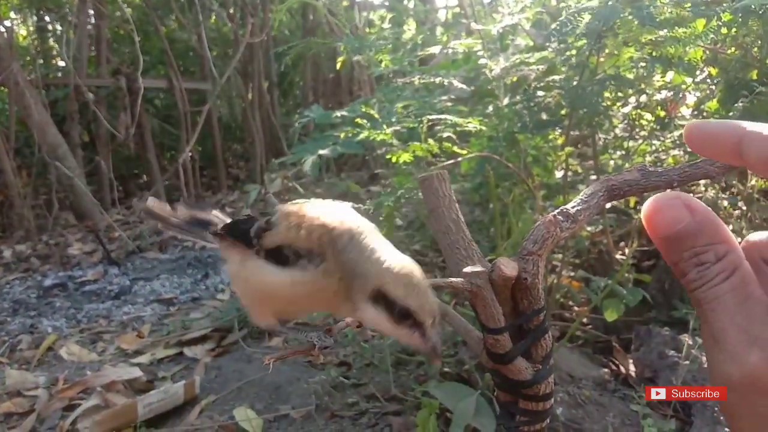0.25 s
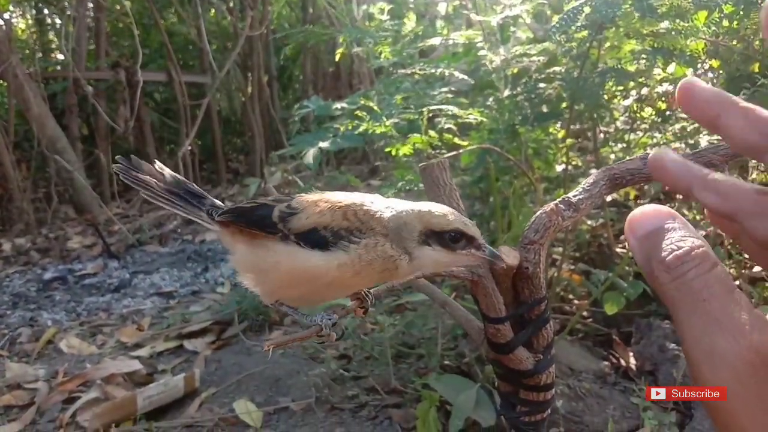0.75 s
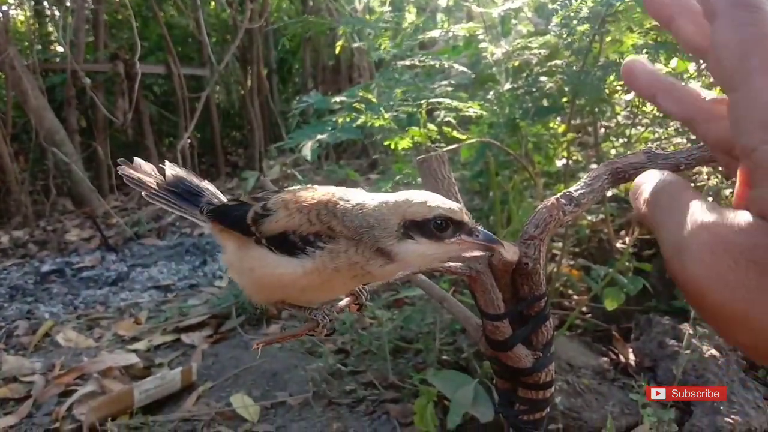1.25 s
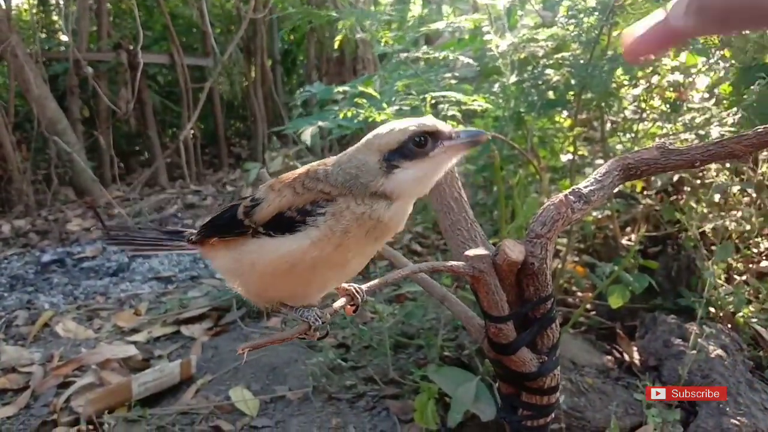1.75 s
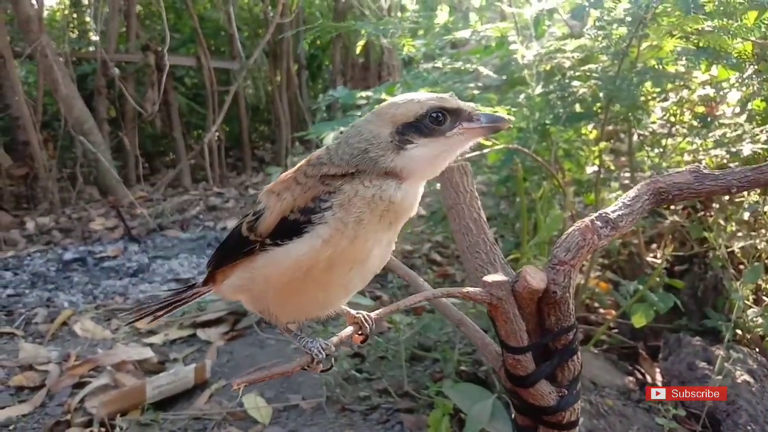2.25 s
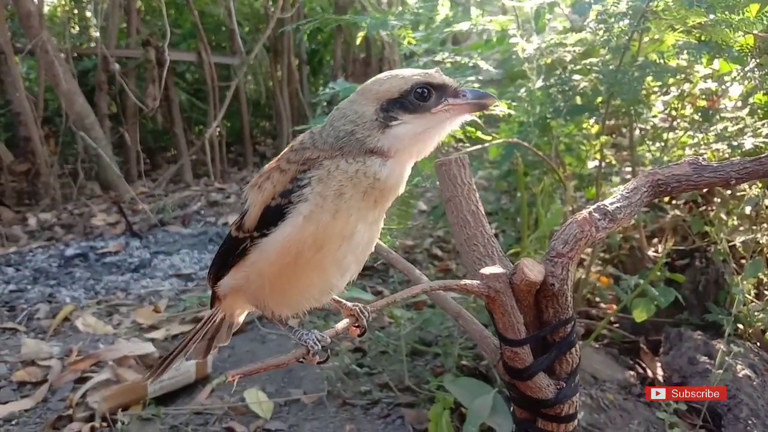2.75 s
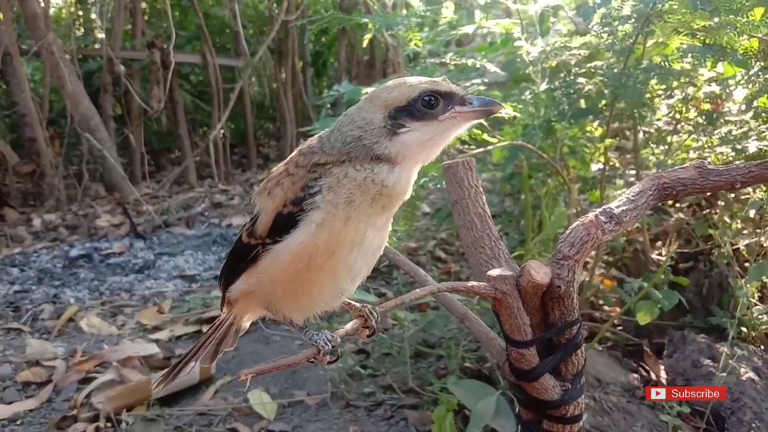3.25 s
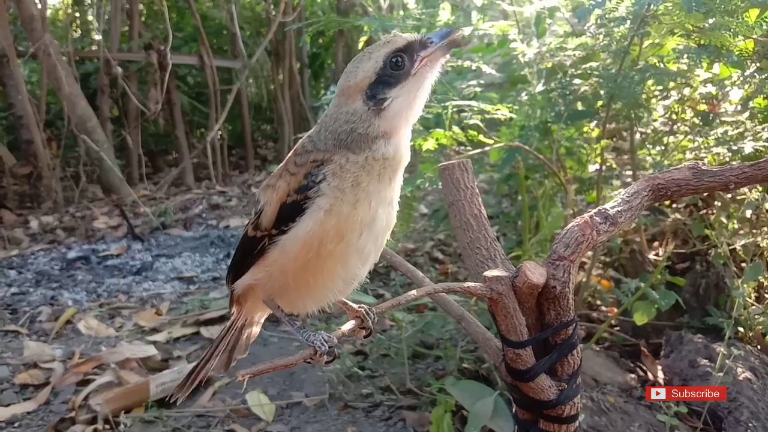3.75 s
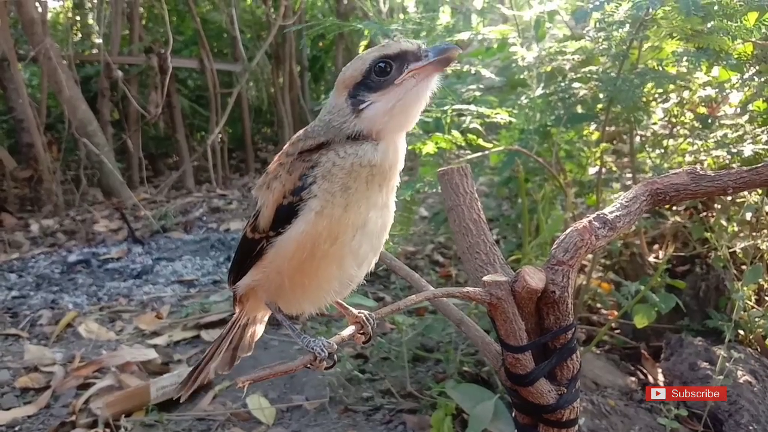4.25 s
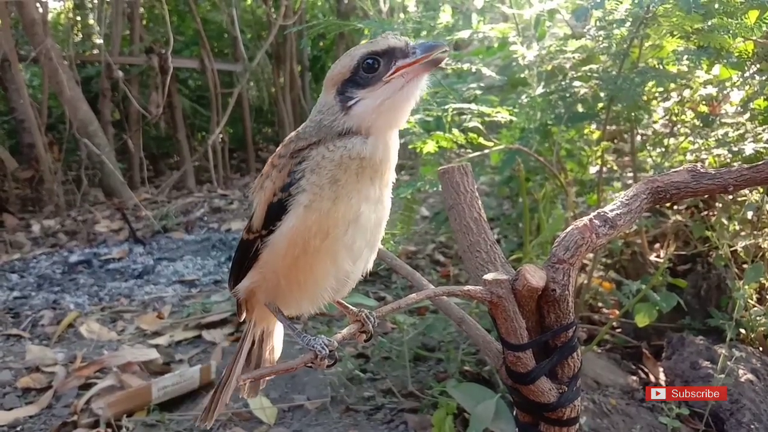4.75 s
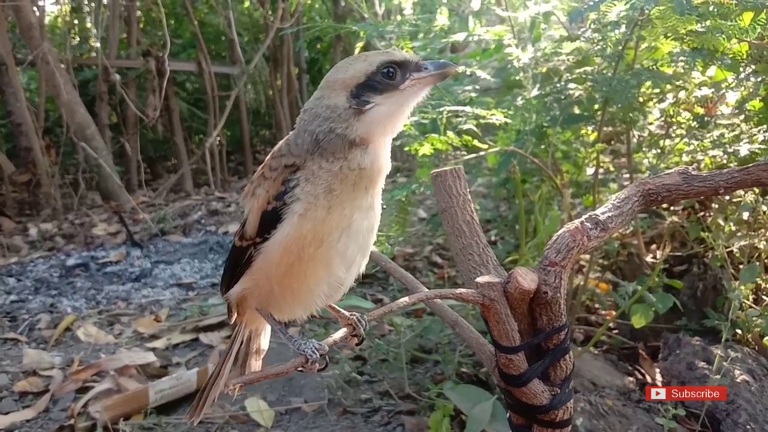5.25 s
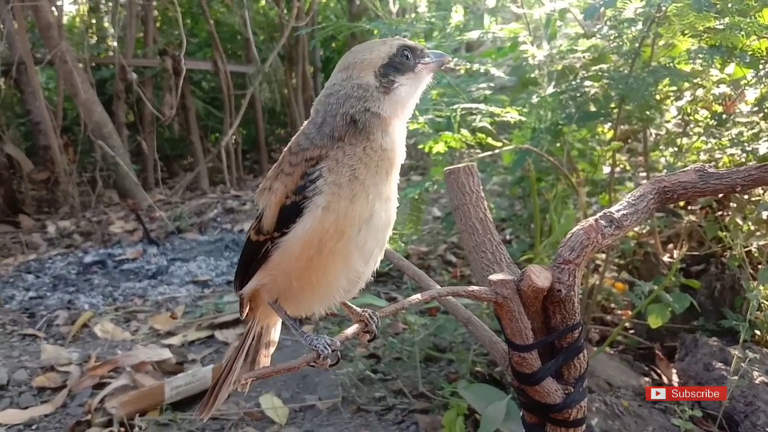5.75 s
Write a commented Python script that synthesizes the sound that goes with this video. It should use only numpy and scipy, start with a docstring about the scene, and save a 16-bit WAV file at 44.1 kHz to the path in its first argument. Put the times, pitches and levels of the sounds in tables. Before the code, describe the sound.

A small bird close by gives a tiny squeak, a snap and falling whistle with rasps, then sharp chirps, while distant birds whistle over soft outdoor hiss.

```python
"""Shrike close to the microphone

A shrike close to a small two-port microphone gives squeaks, a two-voiced whistle, rasps and throbbing
chirps, built from overtones and breath noise. Twigs tick nearby as snaps of noise.
Among the trees other birds whistle, as sines with echo, and a distant cock crows, heard only as echo.
Faint fuzzy tones come and go; a low rumble of far traffic lies under the hiss of the air, all shaped noise."""
import sys
import numpy as np
from scipy import signal
from scipy.fft import rfft, irfft
from scipy.io import wavfile
from scipy.ndimage import uniform_filter1d

SR = 44100
rng = np.random.default_rng(int(sys.argv[2]) if len(sys.argv) > 2 else 0)


def ratio_of_db(decibels):
    """Turn decibels (scalar or array-like) into linear amplitude factors; 0 dB maps to 1."""
    return 10 ** (np.asarray(decibels, float) / 20)


def transcribe(u):
    """Save the signal u as a 16-bit wav file named by the first command-line argument.

    u: samples, shape (n,) or (channels, n), limited to [-1, 1]; the rate is SR.
    q: integer samples, one column per channel.
    """
    v = np.clip(np.atleast_2d(u).T, -1, 1)
    q = np.round(v * 32767).astype(np.int16)
    wavfile.write(sys.argv[1], SR, q)


N = 264159  # samples, about 6 s


def evened(x):
    """Scales to rms 1."""
    return x / np.sqrt(np.mean(x ** 2) + 1e-20)


def read(points, hz):
    """Reads a spectrum on a log-frequency axis."""
    f, value = np.transpose(points)
    return np.interp(np.log(hz + 1), np.log(f + 1), value)


def add(mix, s, sound):
    """Mixes a sound in at s seconds."""
    part = mix[round(s * SR):][:len(sound)]
    part += sound[:len(part)]


def drift(size, span):
    """Smooth chance of rms 1: noise averaged twice over span samples."""
    span = max(int(span), 1)
    once = uniform_filter1d(rng.standard_normal(size), span)
    return evened(uniform_filter1d(once, span))


def coloured(x, points):
    """Filters by a spectrum in dB."""
    size = x.shape[-1]
    gain = ratio_of_db(read(points, np.fft.rfftfreq(size, 1 / SR)))
    return irfft(rfft(x) * gain, size)


def band(x, hz, width):
    """A resonance applied once."""
    return signal.lfilter(*signal.iirpeak(hz, hz / width, SR), x)


def follow(rows, edge_s):
    """Pitch and gain along a table, with soft ends."""
    s, hz, db = np.transpose(rows)
    t = np.arange(s[0], s[-1], 1 / SR)
    ends = np.clip(np.minimum(t - s[0], s[-1] - t) / edge_s, 0, 1)
    return np.interp(t, s, hz), ratio_of_db(np.interp(t, s, db)) * np.sin(np.pi / 2 * ends) ** 2


def glide(start, length, from_hz, to_hz, db, peak, start_db, end_db):
    """A note that slides evenly in octaves, swells to its peak (a share of the length) and falls."""
    peak = np.clip(peak, .01, .99)
    peak_hz = from_hz * (to_hz / from_hz) ** peak
    return [(start, from_hz, db + start_db),
            (start + peak * length, peak_hz, db),
            (start + length, to_hz, db + end_db)]


def trees(x, t60, rise_s, side_db):
    """Scattered echoes from trunks and leaves, nearly alike at both ports."""
    t = np.arange(SR // 2) / SR
    build_up = 1 - np.exp(-(t / rise_s) ** 2)
    taps = rng.standard_normal((2, len(t))) * ratio_of_db(-60 * t / t60) * build_up
    tail = signal.fftconvolve(x[None], taps / np.linalg.norm(taps[0]), axes=1)[:, :N]
    return tail[0] + ratio_of_db(side_db) * tail[1] * np.array([[1], [-1]])


# spectrum of air and microphone hiss: [f/Hz, relative level/dB per Hz]
AIR_SPECTRUM = [(120, -29), (200, 3.5), (294, -5), (334, -2), (394, -13), (558, -10.5), (659, -9),
                (777, -7), (1000, -12), (1230, -7.5), (1370, -11), (3070, -14.5), (6170, -14), (8270, -32),
                (16000, -36.5)]
# ringing hollows of the microphone housing: [f/Hz, width of one pass/Hz, level/dB before flicker, flicker/dB]
HOLLOWS = [(1251, 66, -74, 5), (6170, 130, -76, 1.5), (7160, 150, -85, 0.5), (15200, 1500, -89, 3.5)]
# spectrum of far traffic: [f/Hz, relative level/dB per Hz]
TRAFFIC_SPECTRUM = [(12, -48.5), (20, -24.5), (32, -17), (74, 2.5), (97, 10), (152, 0), (193, -7.5),
                    (274, -25), (300, -37), (390, -46), (660, -120)]
# swell of the traffic before its quick lumps: [t/s, level/dB]
TRAFFIC_SWELL = [(0.0, -67), (0.1, -45.5), (0.28, -61), (0.32, -53), (0.7, -55.5), (0.88, -48),
                 (1.13, -57.5), (1.17, -47.5), (1.3, -57.5), (1.57, -48), (1.6, -56.5), (1.84, -56),
                 (1.87, -47.5), (2.02, -56.5), (2.83, -52), (2.92, -62.5), (3.02, -56.5), (5.34, -59.5),
                 (5.52, -50), (5.6, -60.5), (5.69, -49.5), (5.99, -62)]
# filter on the left-right difference of the background: [f/Hz, gain/dB]
SIDE_SPECTRUM = [(30, -13), (90, -42.5), (400, -16.5), (3000, -11.5), (10000, -23)]


def background():
    """Noise as hiss with slow swells, ringing hollows and a lumpy rumble."""
    noise = rng.standard_normal((3, 2, N))  # three sources, each as middle and difference
    air = ratio_of_db(-66 + 1.0 * drift(N, 9000)) * evened(coloured(noise[0], AIR_SPECTRUM))
    hollows = np.zeros((2, N))
    for hz, width, db, flicker_db in HOLLOWS:
        ring = evened(band(band(noise[1], hz, width), hz, width))
        hollows += ratio_of_db(db + flicker_db * drift(N, 1200)) * ring
    lump_db, lump_s = 1, 0.031
    swell_db = np.interp(np.arange(N) / SR, *np.transpose(TRAFFIC_SWELL)) + lump_db * drift(N, lump_s * SR)
    roar = evened(coloured(noise[2], TRAFFIC_SPECTRUM))
    drone = evened(band(noise[2], 149.7, 6.5))  # an engine far away
    rumble = ratio_of_db(swell_db) * evened(roar + 0.47 * drone)
    mid, side = air + hollows + rumble
    return mid + coloured(side, SIDE_SPECTRUM) * np.array([[1], [-1]])


# faint fuzzy tones far off: [t/s, length/s, f/Hz, width of one pass/Hz, level/dB before the fades]
FUZZY_TONES = [(0.224, 0.17, 5220, 60, -75.5), (0.53, 0.052, 850, 80.5, -64.5), (0.651, 0.43, 780, 90, -70),
               (0.676, 0.32, 1498, 80, -66), (0.808, 0.24, 1737, 70, -71), (1.585, 0.061, 760, 150.4, -66),
               (1.664, 0.32, 1467, 60, -70), (1.695, 0.057, 314, 40, -62), (2.086, 0.114, 610, 50, -72.5),
               (2.891, 0.21, 330, 25, -69), (2.943, 0.066, 2440, 60, -70.5), (3.168, .18, 331, 25, -66),
               (5.096, 0.75, 1045, 90, -73.5)]


def faint_tones():
    """Noise in a narrow resonance, swelling and fading."""
    out = np.zeros(N)
    for s, length, hz, width, db in FUZZY_TONES:
        noise = rng.standard_normal(round(length * SR))
        tone = evened(band(band(noise, hz, width), hz, width))
        add(out, s, ratio_of_db(db) * tone * signal.windows.tukey(len(noise), .6))
    return out


# a distant cock, before its echo: [t/s, f/Hz, level/dB of the fundamental]
COCK_CROW = [(0.081, 838, -50), (.2, 826.4, -52.5), (0.362, 823, -51), (0.459, 757, -72)]


def cock():
    """A hoarse wavering tone with its octave and the fifth between them."""
    out = np.zeros(N)
    hz, gain = follow(COCK_CROW, 0.016)
    turn = 2 * np.pi * np.cumsum(hz * (1 + 0.0204 * drift(len(hz), 250))) / SR
    tone = np.sin(turn) + 0.69 * np.sin(2 * turn) + 0.53 * np.sin(1.5 * turn)
    add(out, COCK_CROW[0][0], gain * (1 + .5 * drift(len(hz), 400)) * tone)
    return out


def whistles(table, flutter, span, warble):
    """Fluttering sines, all of them and the share that arrives directly: the fainter, the more foliage hides."""
    out, direct = np.zeros((2, N))
    for rows in table:
        hz, gain = follow(rows, 0.0037)
        swell = 1 + flutter * drift(len(hz), span)
        turns = np.cumsum(hz * (1 + warble * drift(len(hz), 250))) / SR
        whistle = gain * evened(swell * np.sin(2 * np.pi * turns))
        loudest_db = max(row[2] for row in rows)
        add(out, rows[0][0], whistle)
        add(direct, rows[0][0], whistle * np.clip((loudest_db + 58) / 26, 0, 1))
    return out, direct


# The levels of these tables are at the bird, before foliage and echo.
# winding whistles among the trees, one list a whistle: [t/s, f/Hz, level/dB]
WINDING_WHISTLES = [
    [(1.175, 7650, -67.5), (1.2, 6660, -53), (1.226, 5770, -53.5), (1.24, 4900, -36), (1.251, 3890, -33.5),
     (1.262, 2955, -36.5), (1.277, 2650, -61)],
    [(1.482, 5430, -52.5), (1.497, 4560, -32.5), (1.511, 3390, -36), (1.521, 2825, -38), (1.538, 2540, -61)],
    [(2.08, 3025, -71), (2.115, 2948, -62), (2.13, 2940, -64)],
    [(2.198, 3970, -48), (2.21, 3640, -55), (2.23, 2990, -61), (2.29, 2940, -61), (2.3, 2700, -63),
     (2.35, 2650, -66)],
    [(5.59, 3108, -74), (5.66, 3420, -56.5), (5.69, 3630, -67), (5.71, 4100, -61), (5.73, 3570, -73.5),
     (5.79, 3650, -72)],
    [(5.826, 7550, -66), (5.845, 6940, -60.5), (5.88, 5980, -57.5), (5.92, 5330, -68), (5.95, 5330, -48)],
]
# flick before a falling whistle: [t after its start/s, f/Hz, level/dB added to the flick's own]
FLICK_SHAPE = [(0, 1800, -23), (.024, 2233, -9.5), (.032, 4300, -1)]
# the flicks: [t/s, level/dB]
FLICKS = [(1.194, -46), (1.447, -39.5)]
# plain fading notes among the trees: [t/s, length/s, from f/Hz, to f/Hz, peak level/dB]
PLAIN_NOTES = [(.73, .045, 3284, 3180, -56), (0.773, 0.037, 2630, 2600, -61),
               (1.94, 0.029, 3710, 3850, -62.5), (2.138, 0.033, 3320, 3350, -48),
               (3.197, 0.039, 3100, 2940, -56), (4.345, 0.063, 3150, 3000, -61),
               (4.36, 0.041, 3800, 3770, -67.5), (4.385, 0.042, 2495, 2450, -65),
               (4.86, 0.15, 3280, 2500, -62), (5.29, 0.061, 3140, 2725, -57)]
# hoarse calls from deep in the wood: [t/s, length/s, from f/Hz, to f/Hz, peak level/dB]
DEEP_CALLS = [(0.68, 0.036, 5700, 2146, -49), (3.159, .034, 5400, 2048, -52),
              (4.285, 0.031, 5300, 2093, -51.5), (5.234, .032, 5300, 2115, -51),
              (5.914, 0.059, 4550, 4630, -48.5), (5.92, 0.032, 4300, 2020, -71)]


def far_birds():
    """Whistles with scatter close to the path and echoes from the trunks; deep calls and cock are echo only."""
    flicks = [[(s + after, hz, db + below_db) for after, hz, below_db in FLICK_SHAPE] for s, db in FLICKS]
    notes = [glide(*row, peak=.05, start_db=-4, end_db=-7.5) for row in PLAIN_NOTES]
    far, direct = whistles(WINDING_WHISTLES + flicks + notes, flutter=0.18, span=43, warble=.02)
    leaves = ratio_of_db(1.0) * trees(far, t60=0.12, rise_s=0.0004, side_db=-36)
    trunk_echo = trees(far + cock(), t60=0.39, rise_s=0.013, side_db=-37)
    trunks = ratio_of_db(-7) * coloured(trunk_echo, [(2500, -2.0), (5000, -3.5), (7500, 19.5)])
    calls = [glide(*row, peak=0.594, start_db=-4.5, end_db=-2) for row in DEEP_CALLS]
    hoarse = whistles(calls, flutter=0.52, span=12.7, warble=0.0698)[0]
    deep = trees(hoarse, t60=0.24, rise_s=0.0036, side_db=-30)
    return direct + leaves + trunks + deep


# twigs and bill, near the microphone: [t/s, peak level/dB, colour f/Hz, dullness 0-1]
SNAPS = [(0.563, -35, 4000, 0.6), (1.107, -47, 6100, 0), (1.717, -48, 2380, .95), (2.3986, -17, 2980, 0),
         (4.1115, -51.5, 6000, .8), (4.6703, -39, 4970, .8)]


def ticks():
    """Short dry snaps of decaying noise; dull ones keep little but their own colour."""
    out, t = np.zeros(N), np.arange(600) / SR
    for s, db, hz, dull in SNAPS:
        snap = rng.standard_normal(len(t)) * ratio_of_db(-60 * t / 0.021)
        snap = (1 - dull) * snap + band(snap, hz, 0.55 * hz)
        colour = [(500, -24.5), (1250, -2.5), (7000, -4), (10000, -14 - 20 * dull), (15000, -6 - 36 * dull)]
        snap = coloured(np.pad(snap, 100), colour)
        add(out, s - 100 / SR, ratio_of_db(db) * snap / abs(snap).max())
    return out


# resonance of the shrike's throat and beak, with the microphone's treble: [f/Hz, gain/dB]
VOICE_SPECTRUM = [(700, -26.5), (1000, -36.5), (1250, 3), (1550, -13), (2000, 3.5), (3000, 7), (4000, 8.5),
                  (4900, 12), (5500, 9), (6200, 10.5), (7500, -5.5), (9500, -36.5), (13000, -47.5),
                  (15000, -35)]


def syllable(rough, tilt_db, rows):
    """Membranes in the syrinx make overtones; driven hard they wobble, stutter and hiss."""
    hz, gain = follow(rows, 0.00096 + 0.025 * (rows[-1][0] - rows[0][0]))
    size = len(hz)
    strain = np.clip(rough * np.linspace(.6, 1.3, size), 0, 1)  # each syllable frays towards its end
    turns = np.cumsum(hz * (1 + 0.11 * strain * drift(size, 30))) / SR

    def slope_db(k):
        return tilt_db * np.minimum(k, 3.5)  # the slope evens out above the first few overtones

    tone = np.zeros(size)
    for k in range(1, 13):
        level = ratio_of_db(slope_db(k) + read(VOICE_SPECTRUM, k * hz)) * (k * hz < SR / 2.2)
        wobble = 1 + 0.98 * strain * drift(size, 21)
        tone += level * wobble * np.cos(2 * np.pi * (k * turns + rng.random()))
    puffs = (0.25 + np.exp(-(turns % 2) / 0.66)) * rng.standard_normal(size)  # air escapes on every second cycle
    hiss_spectrum = [(f, db + 0.98 * slope_db(max(f / hz.mean(), 1))) for f, db in VOICE_SPECTRUM]
    hiss = evened(coloured(puffs, hiss_spectrum))
    throb = 1 + 0.29 * strain * np.tanh(drift(size, 54))  # breath pressure stutters
    voice = (1 - strain) * evened(tone) + (0.045 + .5 * strain) * hiss
    voice /= np.sqrt(uniform_filter1d(voice ** 2, size=160) + 0.12)  # breath, not chance, sets the loudness
    return gain * evened(throb * voice)


# Levels are of the voice as it leaves the beak, before the bass cut; roughness grows along each syllable.
# held notes: [roughness 0-1, step from one overtone to the next/dB, list of [t/s, f/Hz, level/dB]]
HELD_NOTES = [ (0.14, -11.5, [(.029, 1200, -40), (.034, 1310, -32), (.042, 1396, -38), (.052, 1505, -38),
              (.066, 1342, -32.5), (.079, 1196, -30), (.084, 1100, -42.5), (.095, 850, -44)]),
              (0.031, -15.5, [(2.372, 3838, -40), (2.382, 3577, -34.5), (2.39, 3330, -32),
              (2.42, 2550, -28), (2.435, 2056, -36), (2.452, 1674, -35), (2.482, 1741, -29.5),
              (2.492, 2192, -32.5), (2.503, 2043, -41), (2.512, 2030, -31.5), (2.52, 1815, -40.5),
              (2.535, 1955, -42), (2.57, 1775, -38), (2.59, 2033, -44.5), (2.6, 1775, -35.5),
              (2.614, 1710, -42)]), (0.23, -9.5, [(2.388, 4080, -35), (2.4, 3585, -32), (2.422, 3030, -31),
              (2.452, 2350, -44), (2.466, 2880, -37)]), (0.076, -27, [(2.481, 2890, -44),
              (2.492, 3120, -34), (2.51, 2930, -44.5), (2.53, 2450, -35)]),
              (0.38, -9.5, [(2.675, 2010, -39), (2.6795, 1760, -29), (2.687, 1726, -42),
              (2.713, 1575, -49.5)]), (0.24, 3, [(3.774, 3130, -32.5), (3.779, 2544, -24.5),
              (3.784, 1820, -33)]), (1, 8, [(3.804, 1880, -31.5), (3.809, 1990, -23), (3.815, 1660, -31)]),
              (0.32, 5.5, [(3.816, 1886, -36), (3.827, 2006, -31), (3.832, 1656, -31), (3.84, 2137, -28.5),
              (3.855, 1750, -44)]), (0.39, -3.5, [(3.856, 1906, -43), (3.865, 2040, -38.5),
              (3.872, 1800, -65.5)]), (0.17, 4.5, [(4.115, 3300, -36.5), (4.119, 2545, -23.5),
              (4.124, 3550, -38.5)]), (0.05, 11.5, [(4.675, 4410, -32), (4.685, 4580, -28),
              (4.689, 4300, -33)]), (0.05, -20, [(4.675, 4670, -39), (4.685, 4910, -35),
              (4.689, 4600, -40)]), (0.59, 3.5, [(4.748, 1994, -30), (4.756, 1794, -22.5),
              (4.767, 1490, -34)]), (0.72, 2.5, [(4.779, 1388, -27), (4.79, 1492, -27.5),
              (4.811, 2558, -26.5), (4.822, 2127, -32), (4.83, 2020, -51)]),
              (.15, -10, [(4.794, 4366, -25.5), (4.803, 4170, -24.5), (4.81, 5160, -27),
              (4.817, 4800, -30)]), (0.0083, -2, [(5.052, 3980, -36.5), (5.072, 3803, -22),
              (5.077, 3887, -20), (5.082, 2720, -38)]), (0.16, 3, [(5.085, 3270, -23), (5.098, 2525, -23),
              (5.101, 1925, -22), (5.107, 1776, -18), (5.11, 1440, -28), (5.114, 1290, -20)]),
              (0.11, 5, [(5.085, 4273, -27), (5.092, 3640, -19.5), (5.098, 2580, -22.5),
              (5.106, 2570, -48.5), (5.113, 3180, -20)]), (.4, -2, [(5.113, 1275, -42),
              (5.124, 1600, -31.5), (5.133, 1795, -30), (5.141, 1454, -31), (5.145, 1710, -32.5),
              (5.152, 1610, -56.5)]), ]
# quick strokes of the chirps, mostly falling:
# [t/s, length/s, from f/Hz, to f/Hz, peak level/dB, step from one overtone to the next/dB]
CHIRP_STROKES = [ (3.746, 0.026, 7700, 6600, -51.5, -12), (3.763, 0.0064, 2114, 2080, -31.5, 8),
                 (3.788, 0.011, 2310, 1620, -17, 13), (3.789, 0.01, 2245, 1700, -30, -15),
                 (3.804, 0.01, 1940, 1700, -31.5, -20), (3.82, 0.0057, 2320, 1660, -33, -33),
                 (4.126, 0.012, 4420, 2547, -21.5, 5), (4.132, 0.0064, 3386, 2250, -17.5, 9.5),
                 (4.142, 0.011, 4455, 2100, -14.5, 8.5), (4.155, .013, 4060, 2130, -16, 10),
                 (4.688, 0.018, 5720, 3800, -16, 11.5), (4.697, 0.012, 4730, 1900, -22, 12.5),
                 (4.718, 0.0089, 4090, 1350, -13, 8), (5.073, 0.014, 3885, 2450, -18, 9),
                 (5.169, 0.0091, 2346, 2400, -39.5, -4.5), ]
# rasps and a breath before the whistle: [t/s, rise/s, fall/s, f/Hz, peak level/dB, roughness 0-1]
RASPS_AND_BREATH = [(.009, 0.0034, 0.01114, 1055, -45, 1), (.019, .006, 0.0044, 1208, -36.5, 0.44),
                    (2.351, 0.022, .008, 3930, -54.5, .95), (2.528, 0.012, 0.013, 1980, -43.5, .83),
                    (2.595, .021, .008, 1738, -37, 0.6), (2.621, 0.026, .027, 1458, -31, 0.73),
                    (2.715, 0.016, .014, 1254, -38, 0.94), (2.759, .019, .009, 1225, -38.5, 1),
                    (2.79, 0.0044, 0.036, 1190, -33, .56), (2.838, 0.0091, 0.012, 1270, -45.5, 0.4)]


def shrike():
    """Held notes, strokes, rasps and a breath; both halves of the syrinx may sound at once."""
    syllables = list(HELD_NOTES)
    for *row, tilt_db in CHIRP_STROKES:
        syllables.append((0.18, tilt_db, glide(*row, peak=.52, start_db=-14.5, end_db=-15.5)))
    for s, rise, fall, hz, db, rough in RASPS_AND_BREATH:
        sagged_hz = hz * (1 - 1.6 * fall)  # pitch sags by a share a second after the peak
        rows = [(s, hz, db - 5.5), (s + rise, hz, db), (s + rise + fall, sagged_hz, db - 15)]
        syllables.append((rough, -9, rows))
    out = np.zeros(N)
    for rough, tilt_db, rows in syllables:
        add(out, rows[0][0], syllable(np.clip(rough, 0, 1), tilt_db, rows))
    return out


def scene():
    """Near bird almost dry, far birds mostly echo."""
    bird = coloured(shrike(), [(500, -30.5), (800, -9.5), (1050, -1)])  # so small a bird radiates no bass
    near = bird + ticks()
    ground = ratio_of_db(-15.5) * trees(near, t60=0.034, rise_s=0.004, side_db=-36.0)  # perch, hand and ground
    wood_echo = trees(near, t60=0.22, rise_s=0.0021, side_db=-26.0)
    wood = ratio_of_db(-23.5) * coloured(wood_echo, [(2000, 6.5), (5400, 0.5), (6200, 5), (7000, 0.0)])
    return background() + faint_tones() + far_birds() + wood + ground + near


def top_cut(x):
    """Nothing passes above the cut-off."""
    return signal.sosfilt(signal.butter(12, 16480, fs=SR, output="sos"), x)


def record(dry):
    """A steep low-pass at 15850 Hz ends the treble of both channels."""
    low_pass = signal.firwin(511, 15850, window=("kaiser", 9), fs=SR)
    limited = signal.oaconvolve(dry, low_pass[None], "same")
    return top_cut(limited)


dry = scene()
out = record(dry)
transcribe(out)
```